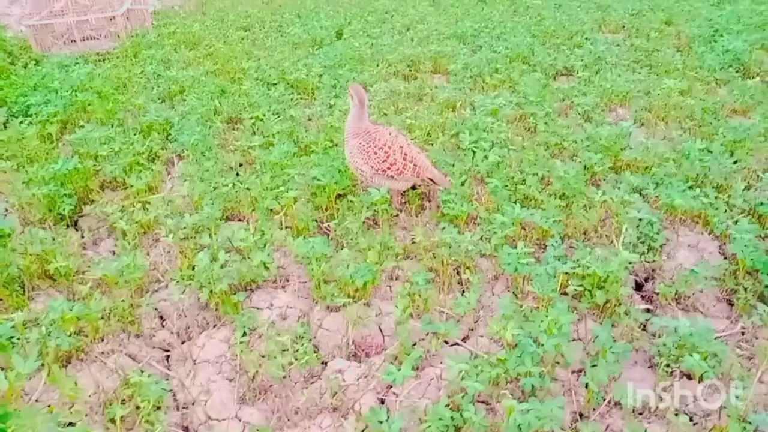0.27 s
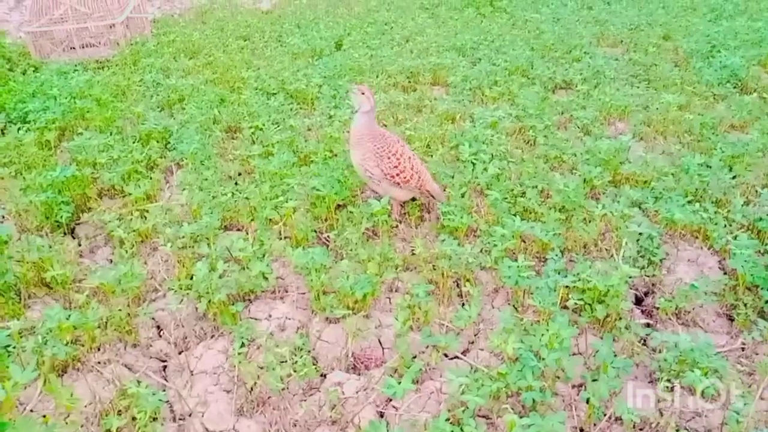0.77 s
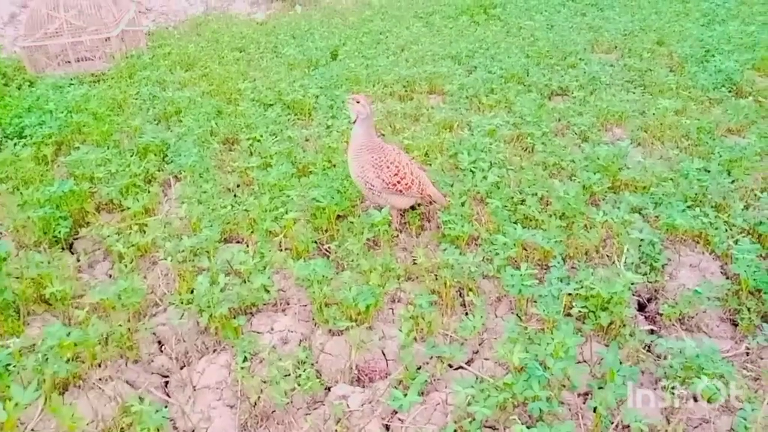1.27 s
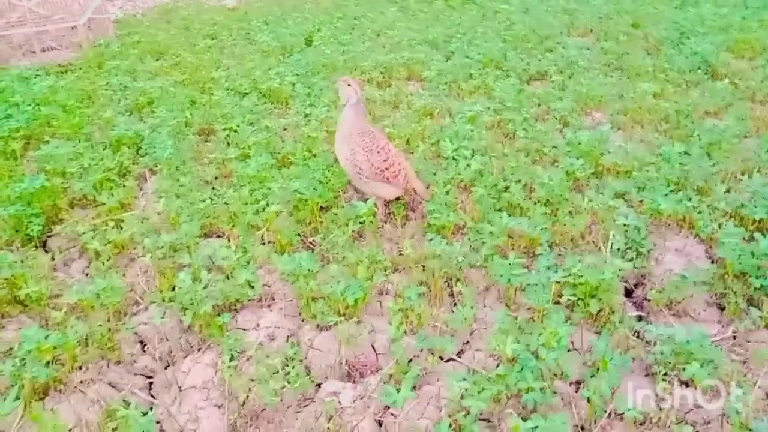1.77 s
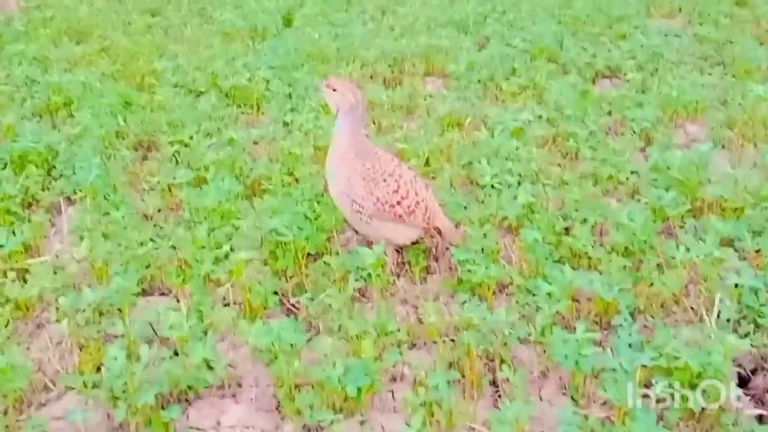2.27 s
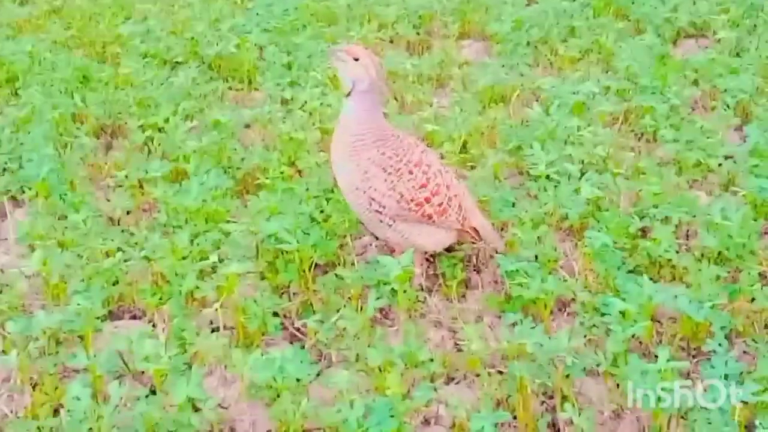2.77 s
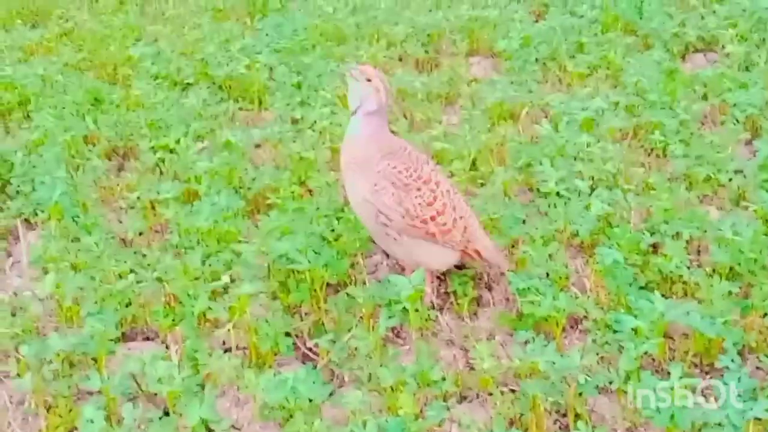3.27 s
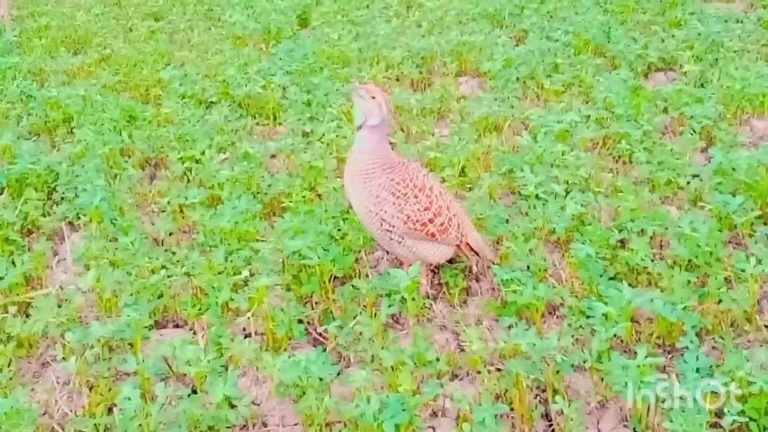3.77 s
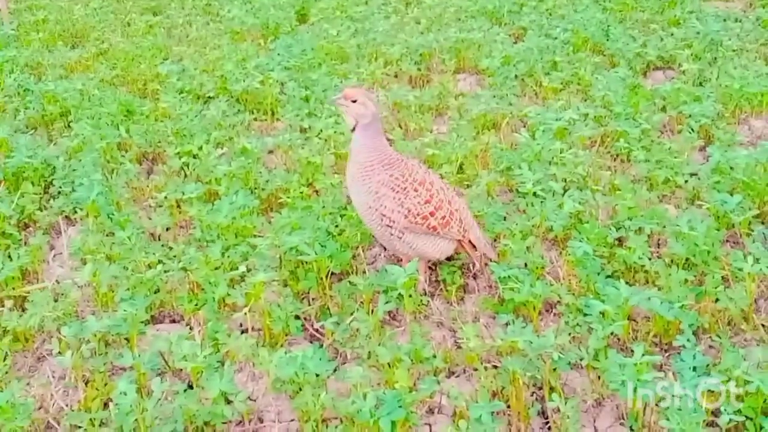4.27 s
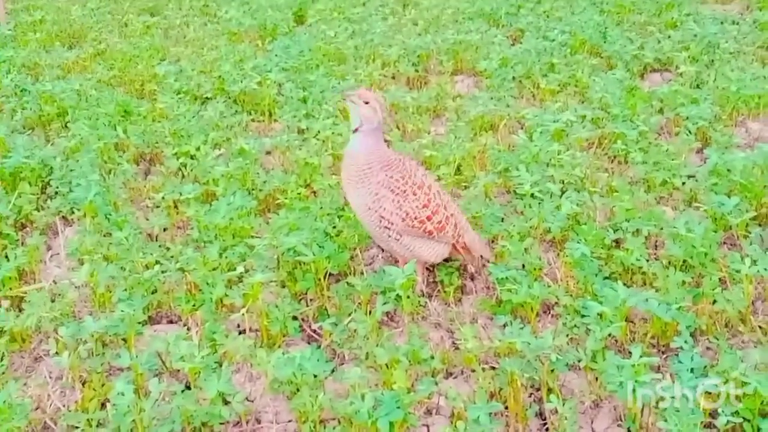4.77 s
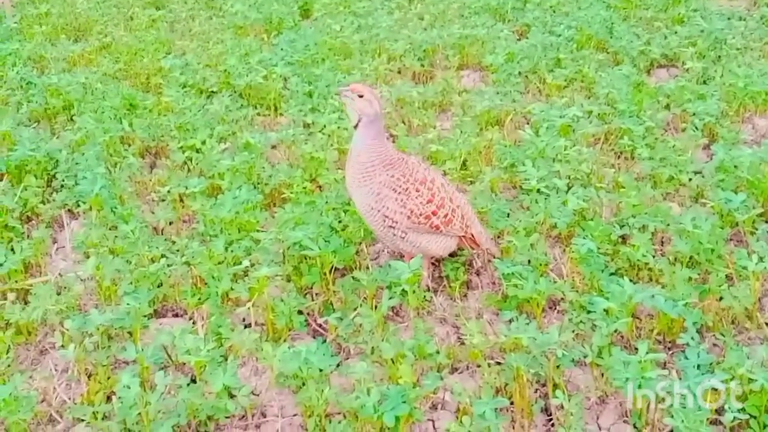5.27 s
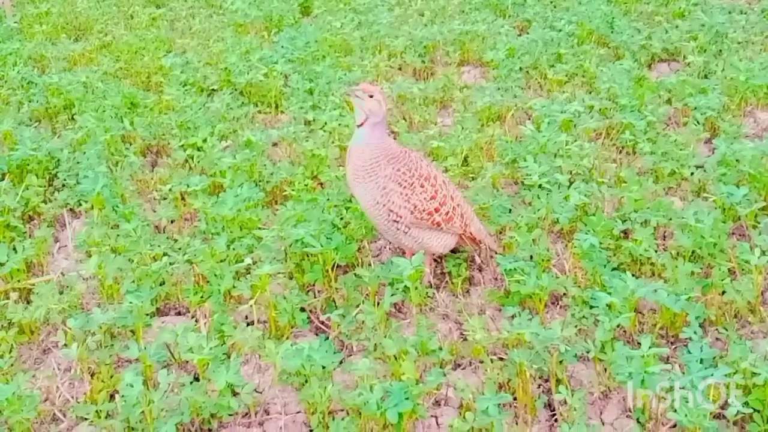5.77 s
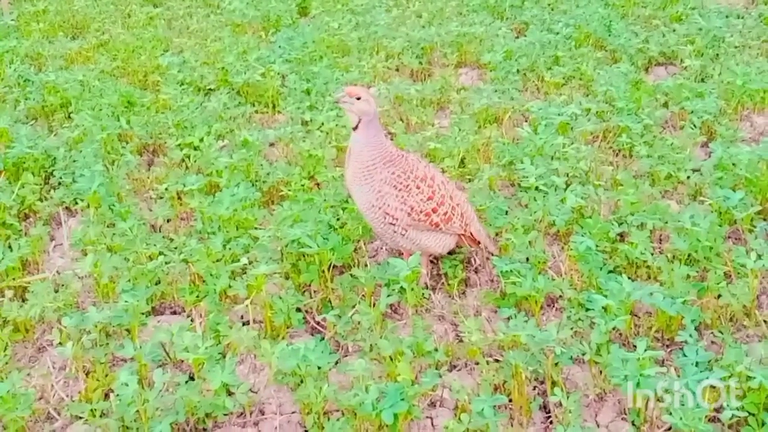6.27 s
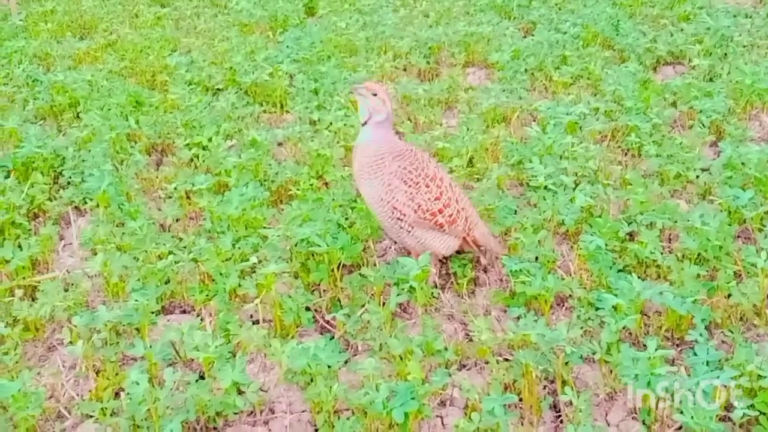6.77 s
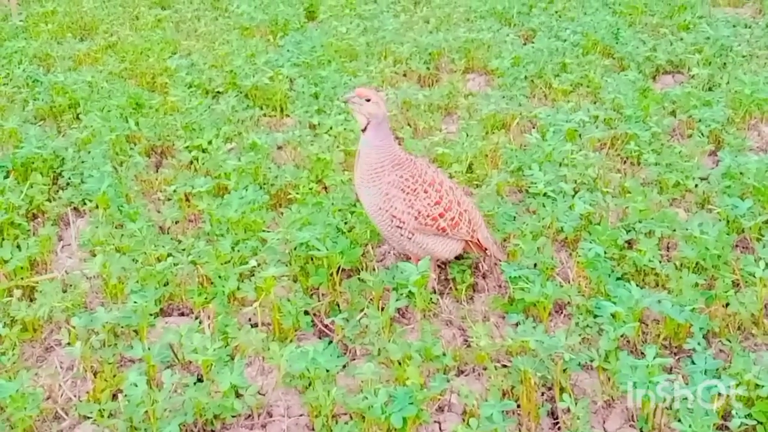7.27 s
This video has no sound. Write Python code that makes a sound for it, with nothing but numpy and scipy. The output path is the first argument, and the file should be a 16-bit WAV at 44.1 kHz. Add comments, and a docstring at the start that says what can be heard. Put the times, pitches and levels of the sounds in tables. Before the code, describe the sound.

A grey francolin in an open field calls over and over: a rising whistle, a sharp double yelp, then a few fading raspy clucks.

```python
"""A loud rising whistle comes first: a grey francolin calling again and again in an open field,
a few steps away. The whistle is a nearly pure gliding tone. A double yelp follows, a clear note with
overtones that breaks in and out of a screech, then three or four fading clucks, made of rasping
pulses that may lock into a falling tone. The field, modelled as scattered reflections, returns a
faint late echo; filtered noise gives almost still air, soft puffs, a hiss and dry ticks."""
import sys
import numpy as np
from scipy import signal
from scipy.io import wavfile

SR = 44100
rng = np.random.default_rng(int(sys.argv[2]) if len(sys.argv) > 2 else 0)


def digitize_waveform(pressure):
    """Quantize a signal to 16-bit integers and store it at the path in sys.argv[1].

    Rows of a 2-D input are taken as channels; values are limited to [-1, 1].
    """
    field = np.atleast_2d(pressure).T
    bounded = np.clip(field, -1, 1)
    quanta = np.round(bounded * 32767).astype(np.int16)
    wavfile.write(sys.argv[1], SR, quanta)


N = 331632  # length in samples
EDGE_HZ = 15750  # upper limit of the sound

# Whistles: start t/s, end t/s, held pitch f/Hz, level/dB before the sag,
# upward flick at the end (share of the pitch)
WHISTLES = [(0.356, 0.528, 2010, -8.5, 0.2), (1.246, 1.417, 1983, -9, 0.12),
            (2.227, 2.384, 1981, -9.5, 0.058), (3.202, 3.336, 1945, -9, .25),
            (4.321, 4.493, 1972, -9.5, 0.11), (5.341, 5.527, 1878, -9, 0.13), (6.315, 6.513, 1909, -9, 0.1),
            (7.411, 7.606, 1966, -9.5, 0.065)]
# Every whistle scoops up to its pitch, swells, sags a little and dies away
SCOOP, SCOOP_S, FLICK_S = .135, .027, 0.013  # scoop depth (share of the pitch), time constants in s
ATTACK_S, RELEASE_S, SAG_DB_PER_S = 0.038, 0.031, -10.5
# It overshoots a little after the scoop: share of the pitch, moment and width in s
CREST, CREST_S, CREST_WIDTH_S = 0.0037, .075, 0.027
# Colour of the air rushing through the beak: f/Hz, relative level/dB
WHISTLE_AIR = [(200, -36.5), (900, -26.5), (1400, -7.5), (1950, 5.5), (2600, 0), (3400, -9), (4600, -9),
               (6400, -21), (7500, -14.5), (9000, -32.5), (13800, -38), (15200, -19)]

# Double yelps, a level note and then a falling one: start t/s, end of the level note t/s,
# pitch f/Hz, level/dB, its overtones level/dB against the fundamental, length of the lead-in screech t/s,
# screech level/dB, fall from f/Hz, fall to f/Hz, overtones of the fall level/dB
DOUBLE_YELPS = [(0.567, 0.607, 2043, -15.5, -16, 0.042, -30, 2157, 1393, -19.5),
                (1.425, 1.458, 2655, -22.5, -0.5, 0.036, -28, 2702, 2274, -1),
                (2.390, 2.43, 2700, -15.5, -14.5, 0.029, -27, 2764, 2300, -2.5),
                (3.074, 3.12, 2717, -16, -12, 0.032, -18.5, 2722, 2260, -3),
                (3.452, 3.505, 2745, -13, -17, .018, -19.5, 2738, 2247, -2.5),
                (4.509, 4.550, 2718, -17, -8.5, .033, -27, 2759, 2274, -2.5),
                (5.541, 5.584, 2730, -15, -8.5, 0.03, -26, 2773, 2300, -2.5),
                (6.530, 6.57, 2722, -15, -8, .033, -27, 2765, 2290, -2.5)]
YELP_RISE = 0.0067  # the level note creeps up by about this share by its middle
GAP_S, FALL_S = .031, .043  # pause between the two notes, length of the falling note
GAP_SCREECH_DB = -25.5  # the voice breaks into a screech between the two notes
FALL_DB, FALL_BY_MIDDLE = -18.5, .27  # the second note falls slowly at first, then fast
CROAK_HZ, CROAK_DB = 1436, -25  # after the fall the voice drops into its low register
# A clear upward glide that opens one double yelp: start t/s, end t/s, first f/Hz, middle f/Hz,
# last f/Hz, fundamental level/dB, overtones level/dB against the fundamental
OPENING_GLIDE = (3.422, 3.438, 1200, 1570, 1500, -24, -2)
# Throat resonances in the yelps: f/Hz, relative level/dB
YELP_THROAT = [(1000, -28.5), (1500, -9.5), (2050, -4), (2400, -3.5), (2560, -12.5), (2740, 10),
               (3500, -16.5), (4700, 8), (5400, -1), (6100, 6.5), (7000, -22), (10800, -33.5), (13500, -38),
               (15000, -31.5)]
# Colour of the screech: f/Hz, relative level/dB
SCREECH = [(700, -59), (1060, -10), (1350, -23), (1700, -20), (2200, -7.5), (3200, -5.5), (3750, -14),
           (4550, 3.5), (5400, -25.5), (6100, -11), (7000, -26), (10000, -38), (15000, -49)]

# Clucks: start t/s, end t/s, level/dB before the swell, tone pitch f/Hz,
# voice (0 stays a rasp, 1 locks into the tone, 2 locks and then jumps up)
CLUCKS = [(0.796, 0.865, -22, 1601, 1), (0.925, 0.986, -24, 1454, 1), (1.055, 1.111, -26, 1406, 0),
          (1.185, 1.247, -36, 1350, 0), (1.675, 1.745, -20.5, 1758, 2), (1.805, 1.872, -21.5, 1676, 2),
          (1.931, 1.991, -24.5, 1432, 1), (2.072, 2.119, -34, 1396, 0), (2.654, 2.729, -20.5, 1797, 2),
          (2.786, 2.855, -21.5, 1680, 2), (2.928, 2.984, -23.5, 1493, 1), (3.721, 3.793, -19.5, 1810, 2),
          (3.847, 3.923, -21.5, 1695, 1), (3.991, 4.056, -23.5, 1538, 1), (4.131, 4.187, -28, 1432, 0),
          (4.764, 4.831, -20.5, 1722, 1), (4.885, 4.951, -21.5, 1617, 1), (5.026, 5.085, -25.5, 1400, 0),
          (5.805, 5.873, -20.5, 1677, 1), (5.925, 5.989, -22.5, 1549, 1), (6.064, 6.121, -27, 1390, 0),
          (6.793, 6.863, -21, 1656, 1), (6.906, 6.971, -22, 1555, 1), (7.044, 7.1, -27, 1420, 0)]
# A higher tone locks in sooner; the highest are weaker as they leave the throat's resonance:
# pitch f/Hz, share of the cluck before it locks, level/dB against the cluck
LOCKING = [(1420, 0.45, 3), (1590, .46, 4.5), (1680, .37, 0), (1810, .26, -4.5)]
# Time before the cluck ends in s; share of pitch lost by the middle and by the end; overtones in dB
TONE_STOPS_S, TONE_DROOP, TONE_DROP, TONE_OVERTONES_DB = .011, 0.015, .18, -13
# Jump: moment as a share of the cluck, pitch ratio, level and overtones in dB
JUMP_AT, JUMP_RATIO, JUMP_DB, JUMP_OVERTONES_DB = .68, 1.242, -5, -4.5
FAINT_TONE_DB = -4  # tone inside a rasp that never locks, against the cluck
RASP_UNDER_TONE_DB = -20
# Throat resonances in the clear notes of the clucks and croaks: f/Hz, relative level/dB
CLUCK_THROAT = [(800, -18), (1200, -5.5), (1500, 3), (1950, -7.5), (2200, -2), (2800, -9), (3800, -24.5),
                (4300, -13), (4850, -6), (5500, -19.5), (6100, -18.5), (7600, -46.5), (10500, -47),
                (15000, -46.5)]
# Colour of the rasp: f/Hz, relative level/dB
RASP = [(250, -44.5), (520, -37), (750, -19), (1050, -8.5), (1450, 4), (2150, -12), (3000, -10.5),
        (3750, -34.5), (4400, -15.5), (4850, -7), (5450, -28.5), (6100, -17.5), (7000, -51.5), (15000, -66)]

# A soft hiss between the short whistle and the yelp after it: start t/s, end t/s, level/dB
HISS = (3.335, 3.42, -50.5)
# Colour of the hiss: f/Hz, relative level/dB
HISS_COLOUR = [(500, -21), (1300, -2), (2800, 0.5), (4500, -2.5), (7500, -8.5), (10000, -25), (15000, -29)]
# Soft low puffs as the bird starts a whistle: t/s, level/dB, low cutoff f/Hz
PUFFS = [(1.252, -46, 100), (2.229, -48, 220), (3.176, -52, 260), (4.319, -43, 90), (5.34, -44, 60),
         (6.315, -49.5, 170), (7.407, -44, 70)]
# Small dry ticks: t/s, level/dB, centre f/Hz
TICKS = [(1.058, -37.5, 6850), (4.212, -39, 2200)]
# Faint gliding tones, low murmurs and higher chirps:
# start t/s, end t/s, first f/Hz, last f/Hz, level/dB
FAINT_TONES = [(0.513, 0.57, 330, 290, -62), (1.266, 1.404, 357, 277, -60.5),
               (3.164, 3.196, 330, 300, -55.5), (3.214, 3.377, 285, 300, -68.5),
               (5.693, 5.727, 4500, 3750, -57), (5.731, 5.76, 4550, 3800, -52),
               (6.158, 6.269, 1487, 1376, -63.5)]
# Colour of the field's echo: f/Hz, relative level/dB
ECHO = [(200, -7), (1400, -10), (2000, -4), (2700, 2.5), (5200, 4), (7000, -4), (12000, -15.5)]
# Colour of the field's still air: f/Hz, relative level/dB
AIR = [(25, -23), (60, -6), (120, -1), (250, -9), (600, -10), (1500, -5.5), (3000, -13), (6000, -13.5),
       (9000, -31), (16000, -26.5)]


def gain_of(db):
    """Turns decibels into a factor."""
    return 10 ** (np.asarray(db) / 20)


def evened(x):
    """Scales to an average strength (rms) of 1."""
    return x / np.sqrt(np.mean(x ** 2) + 1e-20)


def read(points, hz):
    """Looks up the gain in a (f/Hz, level/dB) table, joined on a log-frequency axis."""
    f, db = np.transpose(points)
    return gain_of(np.interp(np.log(hz + 1), np.log(f + 1), db))


def add(mix, s, sound):
    """Lays a sound into the mix at time s."""
    part = mix[round(s * SR):][:len(sound)]
    part += sound[:len(part)]


def colour(x, points):
    """Filters a sound to the given spectrum, with no ringing ahead of the sound."""
    size = 2048
    log_gain = np.log(read(points, abs(np.fft.fftfreq(size, 1 / SR))))
    # the Hilbert transform gives the phase that keeps the ringing after the sound
    ring = np.fft.ifft(np.exp(np.conj(signal.hilbert(log_gain)))).real
    return signal.oaconvolve(x, ring[:size // 2])[:len(x)]


def noise(count):
    """White noise from a random stream of its own."""
    return np.random.default_rng(rng.integers(2 ** 31)).standard_normal(count)


def wobble(count, hz):
    """Slow random drift of rms 1, at rates up to about hz."""
    lead = 2000  # samples for the filter to settle
    lowpass = signal.butter(2, hz, fs=SR, output="sos")
    return evened(signal.sosfilt(lowpass, noise(count + lead))[lead:])


def gate(t, start, end, rise, fall):
    """Opens and shuts smoothly, half open at start and end."""
    opening = np.clip(.5 + (t - start) / rise, 0, 1) * np.clip(.5 + (end - t) / fall, 0, 1)
    return np.sin(np.pi / 2 * opening) ** 2


def whistle(start, end, pitch_hz, db, flick):
    """A nearly pure tone that scoops up, holds and flicks upward, with air rushing through the beak."""
    t = np.arange(-.04, end - start + .02, 1 / SR)
    since, left = np.maximum(t, 0), np.maximum(end - start - t, 0)

    hz = pitch_hz * (1 - SCOOP * np.exp(-since / SCOOP_S) + flick * np.exp(-left / FLICK_S))
    hz = hz * (1 + CREST * np.exp(-((t - CREST_S) / CREST_WIDTH_S) ** 2))
    hz = hz * (1 + .002 * wobble(len(t), 130))
    phase = 2 * np.pi * np.cumsum(hz) / SR
    tone = np.sin(phase) + gain_of(-39.5) * np.sin(2 * phase) + gain_of(-48.5) * np.sin(3 * phase)

    attack = np.sin(np.pi / 2 * np.minimum(since / ATTACK_S, 1)) ** 2
    release = np.sin(np.pi / 2 * np.minimum(left / RELEASE_S, 1))
    lead_in = gain_of(-45.5) * gate(t, -0.022, .02, .01, .02)
    force = gain_of(db + SAG_DB_PER_S * since) * (attack * release + lead_in)

    # the rush of air follows the force of the tone, but less steeply
    air_level = gain_of(-31 + 3.9 * wobble(len(t), 40)) * force ** 0.65
    air = air_level * evened(colour(noise(len(t)), WHISTLE_AIR))
    return start + t[0], force * evened(tone) * (1 + 0.023 * wobble(len(t), 70)) + air


def double_yelps():
    """Screech, level yelp, screech, falling yelp, and a short croak as the pressure drops."""
    out, t = np.zeros(N), np.arange(0, .04, 1 / SR)
    for (start, end, hz, db, overtones_db, lead, screech_db,
         top_hz, low_hz, fall_overtones_db) in DOUBLE_YELPS:
        fall = end + GAP_S
        croak = end + GAP_S + FALL_S
        add(out, *screech(start - lead, start - .003, screech_db))
        out += yelp(start, end, hz * (1 - YELP_RISE), hz, hz * (1 + YELP_RISE / 2), db, overtones_db)

        add(out, *voice_break(end + 0.00073, db=-17.0, centre_hz=2160, width=0.0025))
        add(out, *screech(end - .002, fall - .008, GAP_SCREECH_DB))
        middle_hz = top_hz + FALL_BY_MIDDLE * (low_hz - top_hz)
        out += yelp(fall, fall + FALL_S, top_hz, middle_hz, low_hz, FALL_DB, fall_overtones_db)

        low_note = (croak + .002, croak + .009, CROAK_HZ * 1.05, CROAK_HZ, CROAK_HZ * .97, CROAK_DB, -18)
        add(out, *clear_note(low_note, CLUCK_THROAT, jitter=0.0067, half_db=-23, edge=0.0047))
        add(out, croak - .001, rasp(-26 - 500 * t) * gate(t, 0.0031, 0.021, 0.005, 0.029))
    add(out, *clear_note(OPENING_GLIDE, YELP_THROAT, jitter=.02, half_db=-14, edge=.008))
    return out


def yelp(start, end, first_hz, middle_hz, last_hz, db, overtones_db):
    """One clear note with the beak wide open, entered through a break in the voice."""
    out = np.zeros(N)
    note = (start, end, first_hz, middle_hz, last_hz, db, overtones_db)
    add(out, *clear_note(note, YELP_THROAT, jitter=0.0012, half_db=-26.5, edge=0.0032, air_db=-31.5))
    add(out, *voice_break(start - .003, db=-18.0, centre_hz=2470, width=0.0039))
    return out


def clear_note(row, throat, jitter, half_db, edge, air_db=-40):
    """The voice organ (syrinx) locks onto one pitch; its harmonics glide through the throat's resonances."""
    start, end, first, middle, last, db, overtones_db = row
    t = np.arange(start - edge, end + edge, 1 / SR)
    arch = np.polyfit([0, .5, 1], [first, middle, last], 2)
    hz = np.polyval(arch, np.clip((t - start) / (end - start), 0, 1.1))
    phase = 2 * np.pi * np.cumsum(hz * (1 + jitter * wobble(len(t), 290))) / SR

    def partial(k):
        """One harmonic; higher ones flutter more, up to the fifth."""
        flutter = gain_of(min(k - 1, 4) * 1.5 * wobble(len(t), 90))
        in_band = np.clip((EDGE_HZ - k * hz) / 1000, 0, 1)
        return flutter * read(throat, k * hz) * in_band * np.cos(k * phase)

    # strong and weak cycles alternate a little: faint lines at 0.5 and 1.5 times the pitch
    halves = sum(partial(k + .5) for k in range(2))
    overtones = sum(partial(k) for k in range(2, 10))
    overtones = overtones * gate(t, start, end - .001, edge, .008)
    fundamental = evened(partial(0.99))  # a hair below the pitch
    air = gain_of(air_db) * evened(colour(noise(len(t)), SCREECH))
    tone = fundamental + gain_of(overtones_db) * evened(overtones) + gain_of(half_db) * evened(halves) + air
    return t[0], gain_of(db) * tone * gate(t, start, end, edge, edge)


def screech(start, end, db):
    """The membranes flap unsteadily near a kilohertz, most chaotically at both ends of the screech."""
    t = np.arange(start - .006, end + 0.014, 1 / SR)
    progress = np.linspace(0, 1, len(t))
    chaos = .05 + .1 * (2 * progress - 1) ** 2
    scoop = 1 - .25 * np.exp(-progress / .18)
    drive = pulses(1110 * scoop, chaos, shimmer=.4, air=.25)
    swell = gain_of(1.3 * (progress - 1.5))
    opening = gate(t, start, end, .012, .005)
    return t[0], gain_of(db) * swell * evened(colour(drive, SCREECH)) * opening


def voice_break(s, db, centre_hz, width):
    """A short harsh burst as the voice jumps between rough sound and tone."""
    t = np.arange(-.02, .02, 1 / SR)
    phase = 2 * np.pi * np.cumsum(centre_hz * (1 + .08 * wobble(len(t), 570))) / SR
    burst = np.sin(phase) + .8 * np.sin(2 * phase) + 0.083 * np.sin(3 * phase) + .02 * np.sin(5 * phase)
    return s + t[0], gain_of(db) * evened(burst) * np.exp(-(t / width) ** 2)


def pulses(hz, jitter, shimmer, air):
    """Uneven slaps of the syrinx membranes, with a puff of air in each cycle."""
    count = len(hz)
    rate = hz * np.exp(jitter * wobble(count, 400))
    turns = np.cumsum(rate) / SR
    slaps = sum(np.cos(2 * np.pi * k * turns) * (k * rate < EDGE_HZ) for k in range(1, 40))
    slaps = slaps * (1 + shimmer * wobble(count, 230))
    air_puffs = np.sin(np.pi * turns) ** 2 * noise(count)
    return evened(slaps) + air * evened(air_puffs)


def clucks():
    """Each cluck swells as a rasp, which gives way wherever a tone locks in."""
    out = np.zeros(N)
    for start, end, db, hz, voice in CLUCKS:
        t, voice = np.arange(start - .004, end + 0.0064, 1 / SR), round(voice)
        progress = (t - start) / (end - start)
        push_db = np.interp(progress, [0, .2, .48, .75, 1], [-14, -1.5, 2.5, -0.5, -15.5])
        rough = rasp(db + push_db) * gate(t, start, end, 0.004, .012)
        notes = cluck_tones(start, end, db, hz, voice)
        for note in notes:
            add(out, *clear_note(note, CLUCK_THROAT, jitter=0.006, half_db=-32, edge=0.0055))
        if voice > 0:
            lock, release = notes[0][0], notes[-1][1]
            add(out, *voice_break(lock - .003, db=db - 1.5, centre_hz=2265, width=0.0058))
            rough = rough * gain_of(RASP_UNDER_TONE_DB * gate(t, lock, release, .004, .005))
        add(out, t[0], rough)
    return out


def rasp(level_db):
    """Slow pulses in a half-shut throat: more pressure makes them louder, faster, brighter, more chaotic."""
    hz = 345 * 2 ** ((np.maximum(level_db, -33) + 30.0) / 14)  # doubles every 14 dB
    chaos = np.interp(level_db, [-26, -18], [.035, .12])
    voice = evened(colour(pulses(hz, chaos, shimmer=.36, air=.13), RASP))
    dull = signal.sosfiltfilt(signal.butter(2, 2100, fs=SR, output="sos"), voice)
    bright = gain_of(.7 * (level_db + 23))
    return gain_of(level_db) * (dull + bright * (voice - dull))


def cluck_tones(start, end, db, hz, voice):
    """The clear notes of a cluck: a faint trace, a drooping tone, or a tone that jumps to a higher fall."""
    pitches, shares, gains_db = np.transpose(LOCKING)
    lock = start + (end - start) * np.interp(hz, pitches, shares)
    tone_db = np.interp(hz, pitches, gains_db)
    overtones_db = TONE_OVERTONES_DB - tone_db
    if voice == 0:
        return [(lock - .008, end - .018, hz, hz, hz * .97, db + FAINT_TONE_DB, -16)]
    if voice == 1:
        middle_hz, last_hz = hz * (1 - TONE_DROOP), hz * (1 - TONE_DROP)
        return [(lock, end - TONE_STOPS_S, hz, middle_hz, last_hz, db + tone_db, overtones_db)]
    jump = start + (end - start) * JUMP_AT
    high = hz * JUMP_RATIO
    return [(lock, jump, hz * .97, hz, hz * 1.009, db + tone_db, overtones_db),
            (jump, end - .006, high, high * .96, high * .82, db + JUMP_DB, JUMP_OVERTONES_DB)]


def hiss(start, end, db):
    """Voiceless air, as filtered noise, fills a short pause in the call."""
    t = np.arange(start - .02, end + .02, 1 / SR)
    breath = evened(colour(noise(len(t)), HISS_COLOUR))
    return t[0], gain_of(db) * breath * gate(t, start, end, .02, .02)


def puffs():
    """Soft bursts of low noise as the bird starts a whistle."""
    out, t = np.zeros(N), np.arange(0, .08, 1 / SR)
    puff_colour = [(50, -28.0), (130, -3.0), (210, -10), (310, -4),
                   (650, -30), (1450, -5), (4000, -22.5), (15000, -41)]  # f/Hz, relative level/dB
    for s, db, low_hz in PUFFS:
        puff = colour(noise(len(t)), puff_colour)
        puff = evened(signal.sosfilt(signal.butter(3, low_hz, "high", fs=SR, output="sos"), puff))
        add(out, s - t.mean(), gain_of(db) * puff * np.exp(-((t - t.mean()) / 0.017) ** 2))
    return out


def ticks():
    """Small dry ticks: noise around one frequency that dies away within milliseconds."""
    out, t = np.zeros(N), np.arange(0, .08, 1 / SR)
    for s, db, hz in TICKS:
        tick = evened(colour(noise(len(t)), [(hz / 4, -30), (hz, 0), (hz * 2, -18)]))
        add(out, s - .001, gain_of(db) * tick * np.exp(-t / 0.0021))
    return out


def faint_tones():
    """Gliding sines of wavering pitch: murmurs near 300 Hz, perhaps from the bird's throat, and chirps."""
    out = np.zeros(N)
    for start, end, first, last, db in FAINT_TONES:
        hz = np.linspace(first, last, max(int((end - start) * SR), 2))
        hz = hz + 28 * wobble(len(hz), 45)
        tone = np.sin(2 * np.pi * np.cumsum(hz) / SR)
        add(out, start, gain_of(db) * evened(tone * np.hanning(len(hz))))
    return out


def field(x, near_db, near_t60, far_db, far_s, far_spread):
    """Quick scatter from soil and plants, then a blurred echo from the edge of the field."""
    t = np.arange(SR // 2) / SR
    taps = noise(len(t)) * (rng.random(len(t)) < .08)  # sparse random reflections
    near = taps * gain_of(-60 * t / near_t60) * (t > .003)
    far = taps * np.exp(-abs(t - far_s) / far_spread)
    tail = gain_of(near_db) * near / np.linalg.norm(near) + gain_of(far_db) * far / np.linalg.norm(far)
    return colour(signal.oaconvolve(x, tail)[:N], ECHO)


def still_air():
    """Very faint steady noise of the nearly still air, starting at 0.32 s."""
    return gain_of(-76.0) * evened(colour(noise(N), AIR)) * (np.arange(N) / SR > .32)


def scene():
    """The bird, its echo and the quiet field."""
    bird = double_yelps() + clucks()
    for row in WHISTLES:
        add(bird, *whistle(*row))
    add(bird, *hiss(*HISS))
    # near_t60: seconds for the scatter to fade by 60 dB
    echo = field(bird, near_db=-26, near_t60=.17, far_db=-44.5, far_s=0.19, far_spread=.035)
    small_sounds = puffs() + ticks() + faint_tones()
    return (bird + echo + small_sounds + still_air())[None]


def record(dry):
    """A steep low-pass filter removes what lies above the upper limit."""
    lowpass = signal.firwin(511, EDGE_HZ, window=("kaiser", 9), fs=SR)
    return signal.oaconvolve(dry, lowpass[None], "same")


dry = scene()
out = record(dry)
digitize_waveform(out)
```